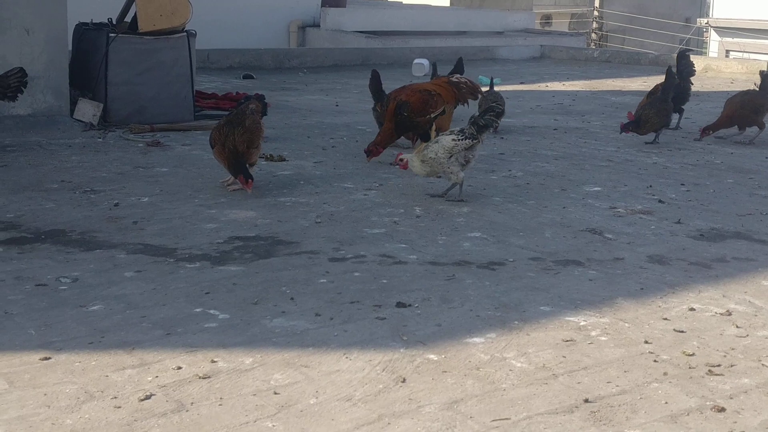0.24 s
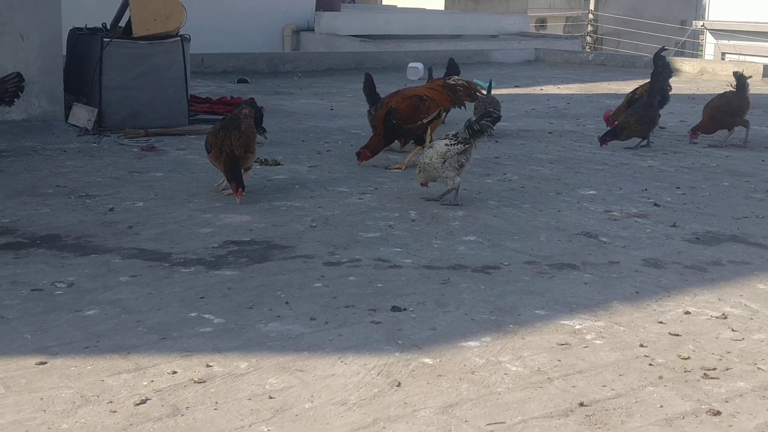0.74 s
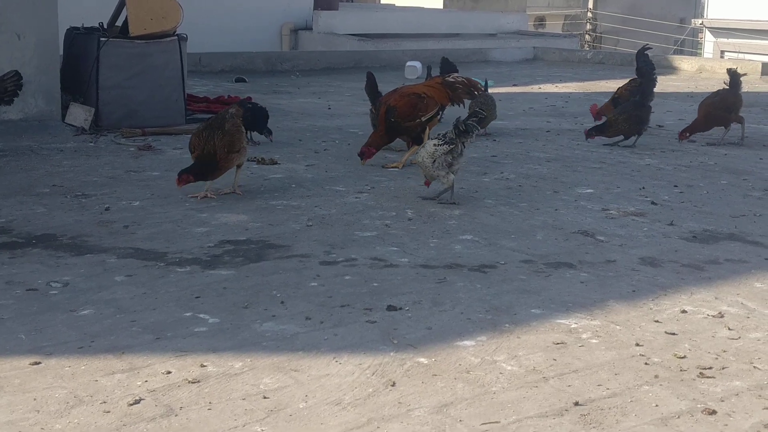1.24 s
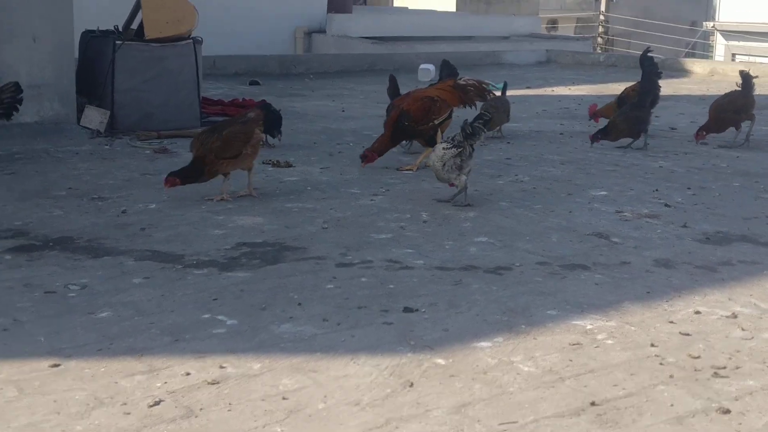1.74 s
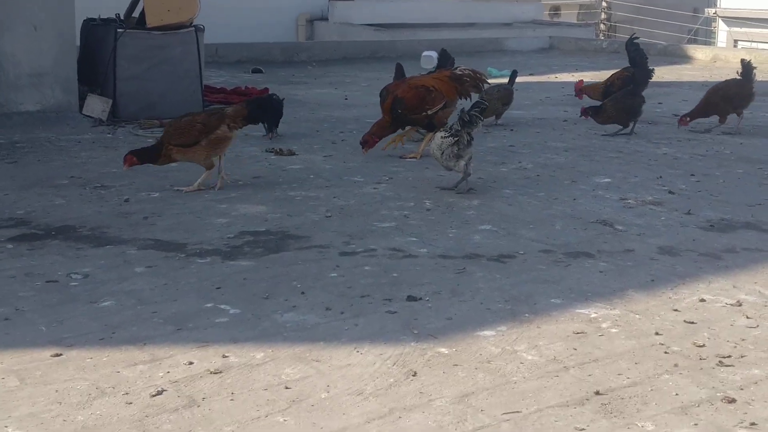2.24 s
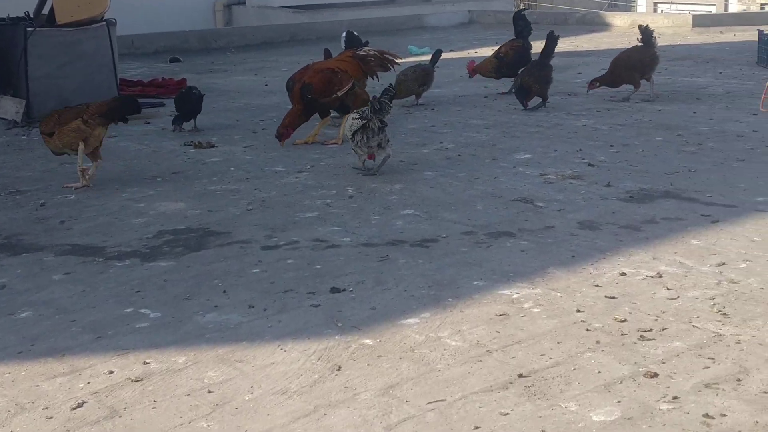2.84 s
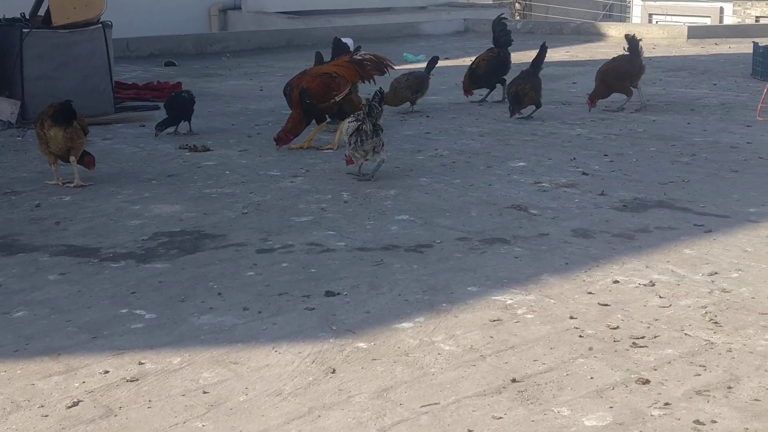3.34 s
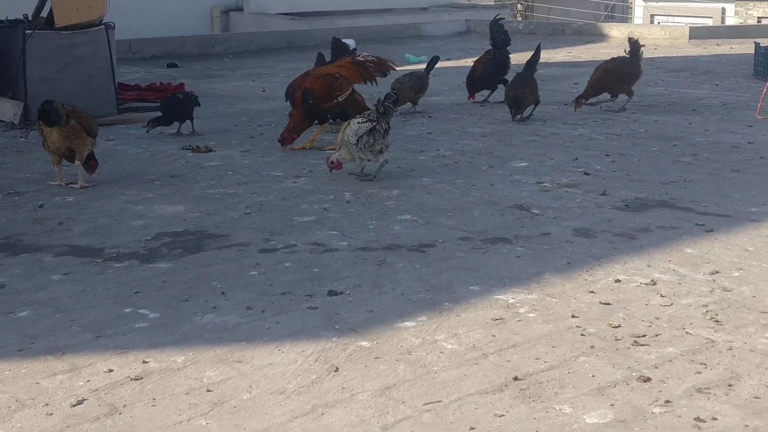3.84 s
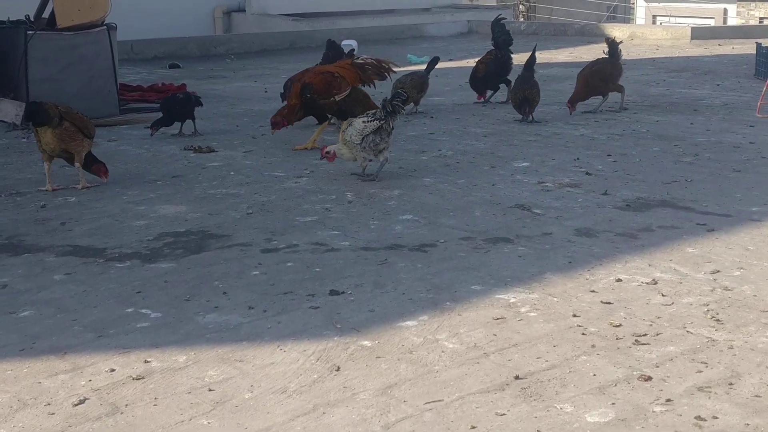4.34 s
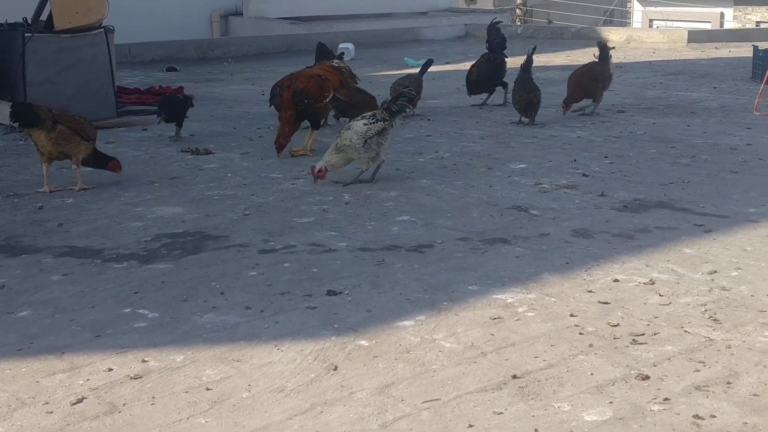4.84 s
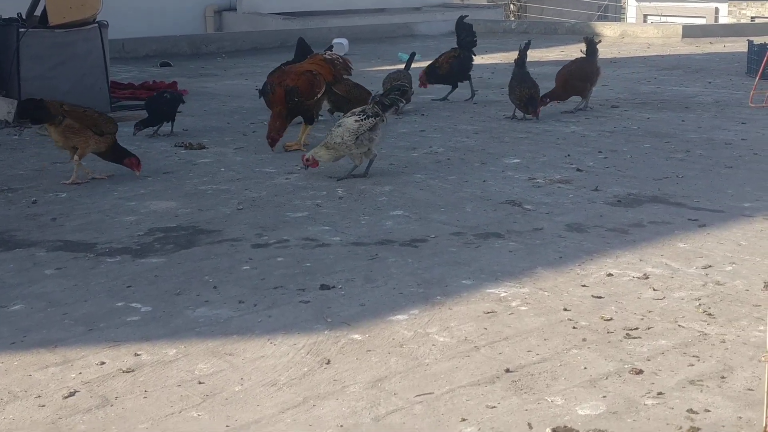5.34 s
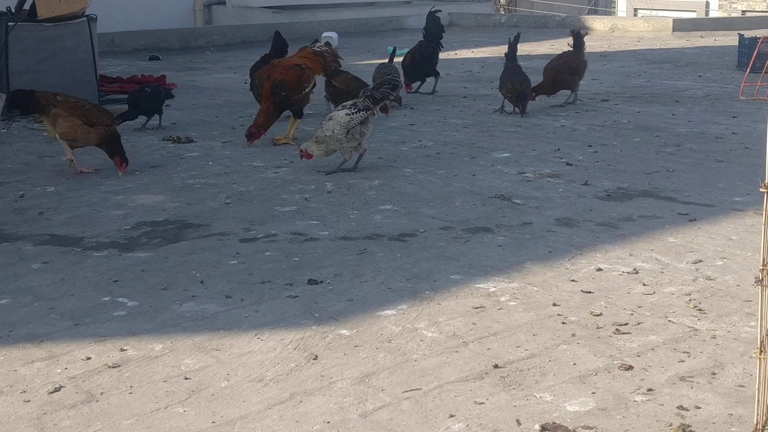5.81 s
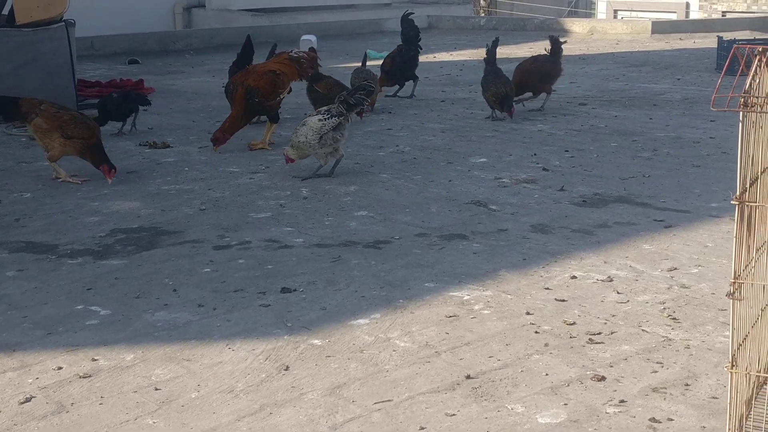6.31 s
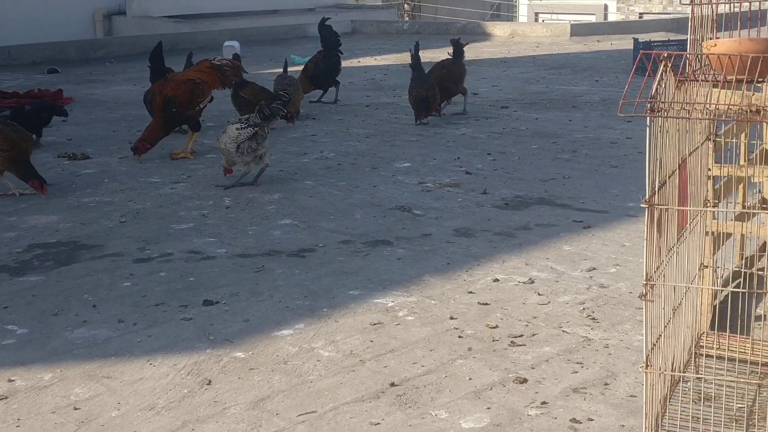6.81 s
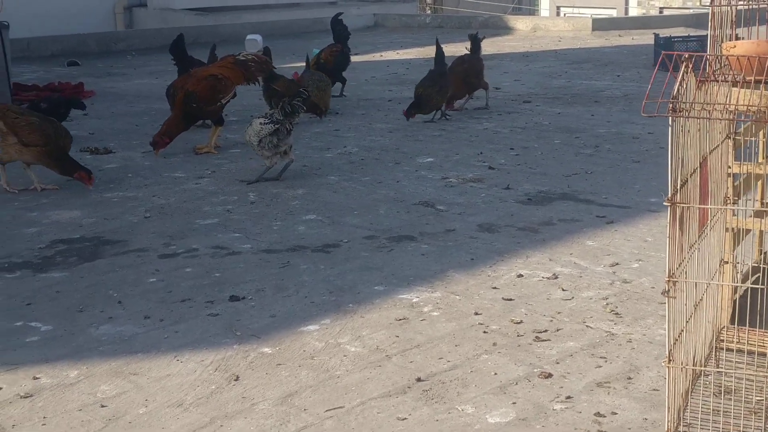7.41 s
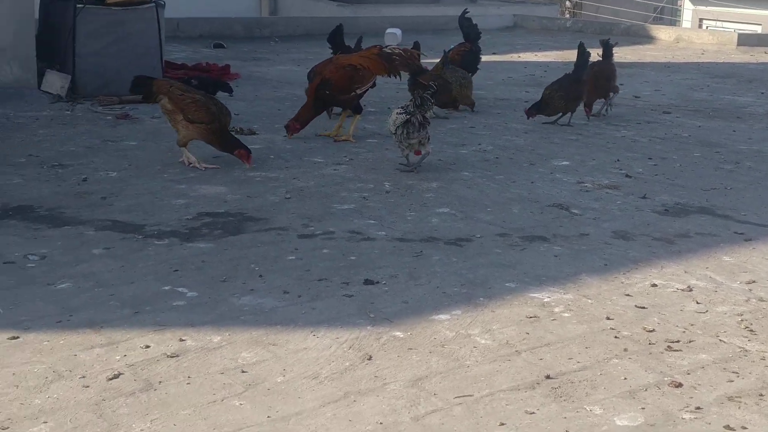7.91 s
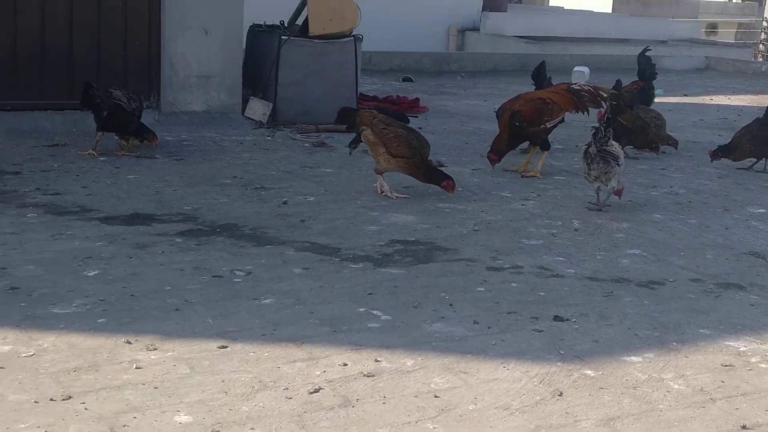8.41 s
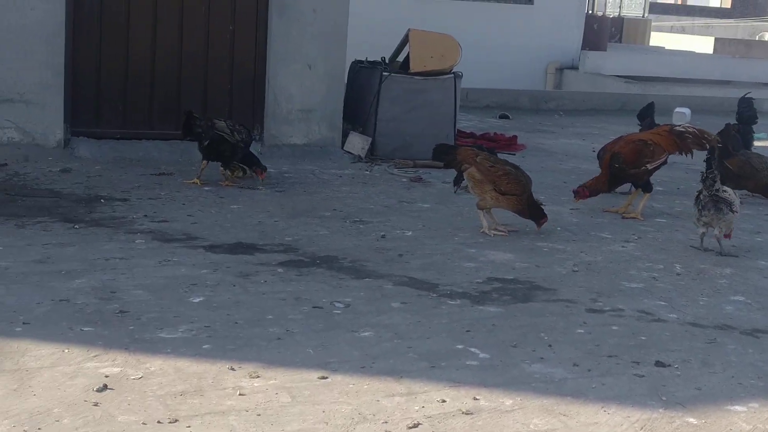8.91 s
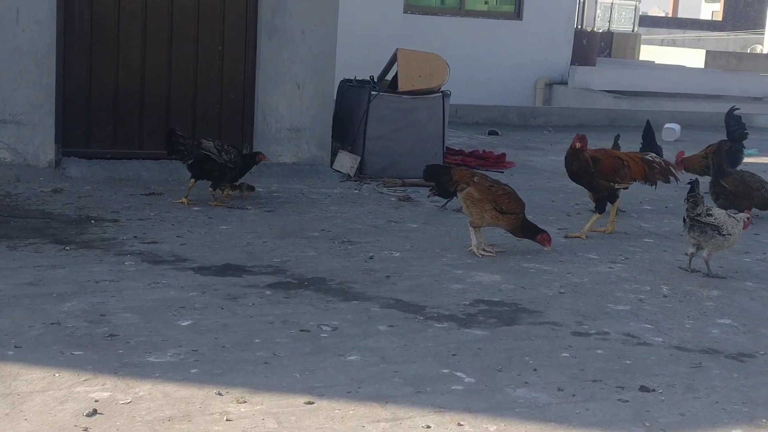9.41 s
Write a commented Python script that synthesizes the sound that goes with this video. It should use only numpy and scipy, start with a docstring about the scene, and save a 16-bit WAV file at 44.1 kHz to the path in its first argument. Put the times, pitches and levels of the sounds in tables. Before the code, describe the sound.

A rooster gives a long, rapid run of short throaty clucks on an echoing concrete yard, with soft hen murmurs and small birds chirping.

```python
"""A long run of short, throaty clucks, eight or so a second: a rooster calls the hens to food on a concrete yard.
Each cluck is a buzz of harmonics with breathy rasp, shaped by the throat, windpipe and beak.
The flock murmurs in hoarse tones, small birds chirp in quick glides, and feet scuff and tick as grainy hiss.
Walls echo, a town rumbles far off as wavering noise, and one dull bump hits the phone.
The phone has two unlike microphone ports; the left one is nearer, thinner and brighter."""
import sys
import numpy as np
from scipy import signal
from scipy.fft import rfft, irfft, next_fast_len
from scipy.io import wavfile
from scipy.ndimage import uniform_filter1d

SR = 44100
rng = np.random.default_rng(int(sys.argv[2]) if len(sys.argv) > 2 else 0)


def waveform_to_disk(signal):
    """Save audio, clipped to [-1, 1], as 16-bit WAV at the path in sys.argv[1]."""
    frames = np.transpose(np.atleast_2d(signal))
    scaled = np.clip(frames, -1, 1) * 32767
    samples = np.round(scaled).astype(np.int16)
    wavfile.write(sys.argv[1], SR, samples)


N = 426006

# Far town noise, relative colour: pitch_hz, level_db (per Hz)
TOWN_COLOUR = [(40, 12), (60, 2.5), (90, 3.5), (200, -4), (330, -12.5), (410, -22.5), (630, -6), (900, -11),
               (1380, -12), (2730, -20.5), (5250, -33.5), (6150, -42.5), (8400, -48), (12500, -39.5),
               (15800, -37.5)]
# Traffic bass near 60 Hz: start_s, level_db
TRAFFIC_BASS = [(0, -45.5), (.4, -49), (1.05, -43.5), (1.9, -50.5), (2.3, -48), (3.7, -53.5), (4.7, -51.5),
                (6.5, -49.5), (9.66, -63)]
# Echoes from the nearer walls: left_delay_s, right_delay_s, level_db
WALL_ECHOES = [(.034, .028, -21), (.068, .062, -28)]
# Bird chirps: start_s, length_ms, level_db (at 3500 Hz), first_pitch_hz, last_pitch_hz
CHIRPS = [(0.066, 33, -50.5, 2770, 4840), (0.463, 26, -49, 3000, 5260), (0.623, 22, -46.5, 2970, 4940),
          (0.806, 26, -49, 2540, 4470), (0.891, 37, -53, 3630, 5600), (1.017, 20, -51, 3290, 4210),
          (1.237, 21, -47, 2600, 4280), (1.311, 27, -51, 2940, 5150), (1.441, 43, -46, 3610, 2770),
          (1.471, 32, -45, 2790, 4370), (2.952, 16, -38, 4250, 3170), (2.966, 27, -43, 4450, 4270),
          (3.088, 16, -35, 5580, 3300), (3.104, 31, -43.5, 4530, 4200), (3.097, 31, -39, 3240, 3200),
          (3.901, 41, -55, 3900, 2910), (4.577, 39, -55, 2740, 4500), (4.155, 25, -56, 2740, 2930),
          (4.38, 22, -53, 3550, 3520), (4.55, 40, -56, 5700, 5140), (4.74, 26, -48, 3280, 4050),
          (4.667, 21, -46, 2560, 4270), (4.831, 35, -46.5, 2930, 4850), (4.91, 14, -50, 2660, 4350),
          (5.149, 37, -50, 2720, 5030), (5.277, 25, -46.5, 2460, 4100), (5.13, 13, -53, 4600, 3980),
          (5.305, 57, -51, 3900, 3750), (5.378, 36, -60, 5700, 5000), (5.419, 21, -50, 2380, 4180),
          (5.635, 35, -49, 2450, 5200), (5.87, 250, -63, 9550, 10800), (6.08, 97, -62, 10750, 9800),
          (6.122, 27, -55, 2600, 5270), (6.335, 25, -50, 4100, 3750), (6.352, 23, -51, 3800, 5030),
          (6.61, 18, -45, 2740, 3970), (6.662, 23, -56, 4060, 5140), (7.121, 32, -53, 2690, 5140),
          (7.28, 33, -48, 3700, 3080), (8.555, 26, -53, 3240, 4960), (8.7, 61, -61, 4800, 4230),
          (8.797, 23, -47, 2690, 4200), (8.92, 94, -57, 10500, 11100), (9.099, 20, -57, 4100, 5240),
          (9.11, 90, -65, 10800, 9650)]
# Foot scuffs: middle_s, length_ms, level_db, extra_level_db below SCUFF_SPLIT_HZ
SCUFFS = [(.95, 400, -52, 0), (1.268, 104, -63, 11), (1.42, 215, -56.5, 4.5), (1.685, 26, -60, -10),
          (1.775, 152, -39, -13), (1.89, 20, -50, -5), (2.314, 61, -53, 6.5), (2.45, 300, -49.5, -12),
          (2.594, 106, -47, 2.5), (2.74, 140, -50.5, -5), (2.849, 115, -36, -8.5), (3.094, 103, -39.5, -7),
          (3.252, 138, -41.5, -7.5), (5.822, 100, -52, 2), (9.3, 335, -56, 6), (9.509, 63, -57, 3),
          (9.62, 240, -54.5, -1)]
# Scuff hiss, relative colour: pitch_hz, level_db (per Hz)
SCUFF_COLOUR = [(1180, 4), (2000, 8), (2320, 3), (2830, 6), (5550, -7), (6540, -10.5), (7190, -21),
                (10300, -7.5), (15800, -13.5)]
# Ticks of grit: start_s, level_db (before the grit's random size)
TICKS = [(0.3501, -63), (0.5856, -64), (1.9826, -53), (3.2, -49), (3.5014, -59.5), (5.1238, -56),
         (5.816, -53)]
# Bumps on the phone: start_s, level_db (before rise and decay), pitch_hz, fade_s (to fall 60 dB)
KNOCKS = [(7.187, -4, 182, 0.012)]
# Rooster clucks: start_s, length_ms, level_db, pitch_hz (near mid-cluck), loudest_point (share of length);
# then added to VOICE: pitch_sag (share of pitch), second_harmonic_db, middle_db, beak_db
CLUCKS = [(0.017, 35, -35.5, 273, 0.37, -0.09, 6.5, 2.5, 11),
          (0.151, 20.5, -31, 319.4, 0.41, -0.009, -3, -2.5, -3),
          (0.28, 32.7, -34.5, 323.7, 0.66, -0.08, 3, -0.5, -7),
          (0.347, 24, -35.5, 347.5, 0.46, 0.05, 0, 3, -12),
          (0.414, 18.6, -27, 316, 0.28, -0.059, -4.5, -1, -2),
          (0.533, 21.6, -31, 341.4, 1, -0.026, 0, 0, -7.5),
          (0.656, 23.6, -32.5, 302.4, 0.44, -0.014, 4, 0.5, -9.5),
          (0.783, 12, -28.5, 315.3, 0.67, -0.079, 0.5, -12, -11),
          (0.896, 20, -26.5, 313, 0.39, 0.018, -1, -4, -8.5),
          (1.017, 17.7, -26, 312.5, 0.59, -0.036, 1.5, 0.5, -5),
          (1.13, 24, -26.5, 313.5, 0.35, 0.03, -0.5, 1, -0.5),
          (1.255, 23.5, -26.5, 313.5, 0.51, -0.011, 1, 1.5, 4),
          (1.38, 22, -25.5, 309.8, 0.26, 0.0061, 1.5, 0.5, 2),
          (1.505, 26.4, -26.5, 305.3, 0.11, -0.024, 3, 0.5, 2),
          (1.626, 24.2, -24.5, 312, 0.52, -0.034, -1.5, 0, -1),
          (1.752, 22.5, -24.5, 307.8, 0.52, -0.019, -2, 0, -4),
          (1.872, 33.7, -27.5, 306.5, 0.35, -0.051, 0, 0, 4),
          (2.004, 35, -25.5, 309.2, 0.28, -0.015, -1, -3, -1),
          (2.143, 30.3, -25, 309, 0.58, 0.0076, -0.5, -1.5, 0),
          (2.3, 34.4, -24.5, 320, 0.44, -0.1, -1, 1.5, 5),
          (2.464, 47, -25.5, 310.2, 0.36, -0.041, 1, 1.5, 2),
          (2.577, 27, -25.5, 323, 0.4, -0.0039, 1, 1, 1), (2.608, 20, -29, 317.4, 0.36, -0.031, 6, 4, 9),
          (2.732, 30, -25.5, 311.2, 0.14, 0.0053, 2.5, 3.5, 0),
          (2.824, 24.2, -26.5, 325.6, 0.59, 0.0045, 3.5, 2, 7),
          (2.964, 18.4, -23, 311.8, 0.97, -0.029, 3, 6, -1),
          (3.104, 24.0, -27.5, 307.3, 0.62, -0.0073, 5.5, 5.5, -1),
          (3.248, 33, -25.5, 319.2, 0.28, -0.036, 2, 4.5, -1.5),
          (3.4, 43, -27, 306.4, 0.23, 0.029, 3, 3.5, 2.5),
          (3.567, 40, -25, 310, 0.42, 0.014, 2.5, 1.5, 1.5),
          (3.721, 31.5, -30.5, 307, 0.48, -0.0062, 4, 2, 4),
          (3.772, 35, -36, 330, 0.2, -0.035, -2, -10, -13),
          (3.815, 23.5, -27, 318.3, 0.15, -0.023, -4.5, 2, 3.5),
          (3.85, 18.6, -30, 312.7, 0.34, -0.011, -0.5, 2, 1.5),
          (3.964, 34.5, -32, 301.5, 0.14, -0.054, 1, 2, 4),
          (3.998, 26, -34.5, 311.4, 0.33, 0.05, 3, -10, -12),
          (4.12, 33.6, -29, 304.3, 0.18, -0.044, 0, 3.5, 4),
          (4.264, 42, -29, 313.5, 0.28, -0.061, 3, 4, -2), (4.419, 36, -30.5, 320, 0.39, -0.024, 3.5, 4, 3),
          (4.56, 39, -28, 328, 0.22, -0.036, -2, 1.5, 1),
          (4.68, 22, -26.5, 322.6, 0.31, -0.028, -2.5, 2, 0),
          (4.793, 40.6, -32, 321, 0.36, 0.029, 0.5, 2, -1), (4.919, 36, -31, 311.2, 0.3, -0.13, 4, 2, 3),
          (5.049, 36, -28.5, 318.3, 0.3, -0.02, 0.5, 2, -1),
          (5.136, 20.8, -27.5, 321, 0.41, 0.041, -2, 1.5, -0.5),
          (5.235, 25.7, -31, 326.7, 0.41, 0.024, 1, -0.5, 4),
          (5.352, 27, -29, 317.7, 0.19, -0.14, 4.5, 4, 2),
          (5.471, 35.6, -29, 323.6, 0.28, -0.063, 4, 2.5, -4),
          (5.592, 29.6, -31, 339, 0.61, 0.014, 0.5, 2, -1),
          (5.709, 33, -27.5, 327.6, 0.05, -0.091, 0.5, 0, 5.5),
          (5.824, 35.7, -26.5, 315.3, 0.16, -0.052, 3.5, 3.5, 3),
          (5.955, 29.2, -24, 354.2, 0.33, 0.002, -3, 1.5, 0.5),
          (6.083, 38.5, -25, 359.7, 0.29, 0.022, -1, -1, 3.5),
          (6.223, 28.6, -25, 370.6, 0.36, 0.033, -3, -1, 2.5),
          (6.366, 34.3, -30, 374.4, 0.69, 0.072, -6, -6, -5),
          (6.466, 63, -29, 333, 0.02, 0.002, -1, 4, -0.5),
          (6.581, 29.2, -27, 357.4, 0.4, 0.017, -5.5, 4, 1),
          (6.698, 34, -30.5, 383, 0.37, -0.04, -8.5, 1, 3),
          (6.816, 36, -30, 366.3, 0.43, 0.062, 0.5, 0.0, -7),
          (6.939, 40.7, -30, 359, 0.7, 0.065, 1, 0, -2.5),
          (7.073, 42.5, -30, 386.8, 0.7, 0.041, 2, -7, -0.5),
          (7.165, 76, -29, 341.3, 0.57, -0.081, 4, -6.5, 3.5),
          (7.313, 32, -28, 342.3, 0.46, -0.1, 2.5, -2.5, 4.5),
          (7.444, 37.2, -26.5, 371.4, 0.92, -0.0064, 0.5, -3, 6.5),
          (7.587, 44.4, -27.5, 340.7, 0.13, -0.0099, 2, -1, 0),
          (7.723, 31.4, -28.5, 362.4, 0.43, 0.025, -3, -2, 2.5),
          (7.848, 59, -30.5, 383, 0.49, 0.039, 2, -3, 5), (7.919, 72, -31, 353, 0.54, 0.037, -1, 3.5, -5),
          (7.984, 47, -31.5, 347.4, 0.32, 0.011, -2.5, 2.5, -1),
          (8.1, 39, -29, 366.5, 0.39, 0.051, -5.5, 1, -2.5),
          (8.234, 40.6, -27.5, 402, 0.73, 0.042, -2.5, 0, 0),
          (8.37, 37, -26.5, 369.7, 0.43, -0.055, -0.5, -3, -1.5),
          (8.491, 35, -27.5, 373, 0.6, -0.017, -2.5, 0, -0.5),
          (8.634, 41, -27.5, 383.3, 0.46, -0.043, -1, -5, -0.5),
          (8.73, 33.6, -27, 351, 0.51, 0.07, -3.5, -1.5, -3.5),
          (8.873, 45, -27.5, 395.6, 0.54, -0.047, -2, -0.5, 0.5),
          (9.056, 57, -28.5, 367.2, 0.29, -0.05, -1, -1, 0),
          (9.14, 72.6, -32.5, 373.8, 0.25, -0.039, -2, -1, -1),
          (9.285, 60, -44.5, 300, 0.42, 0.081, 0, 0, 2.0), (9.374, 21, -27, 282.6, 0.072, 0.16, 17, 4, 10),
          (9.466, 49, -35.5, 344.5, 0.64, 0.0073, -2, -4, -3),
          (9.525, 17, -35, 300.7, 0.49, -0.033, 5, 10, 13)]
# How the voice changes along the run: start_s, pitch_sag (share of pitch),
# second_harmonic_db (against the 3rd, at REST_HZ), fourth_harmonic_db (against the 3rd),
# middle_db (middle resonance), beak_hz (beak resonance), beak_db, lead_in_db
VOICE = [(0, 0.15, -7, -10, -12, 2610, -25.5, -10), (.75, 0.1, -11, -16.5, -13.5, 2780, -2, -15.5),
         (1.3, 0.075, -13.5, -8, -13.5, 2670, -21.5, -18.5),
         (2.1, 0.05, -13.5, -8.5, -11, 2580, -23.5, -20.5),
         (2.9, 0.016, -18.5, -14.5, -20, 2400, -24.5, -23),
         (3.6, -0.022, -13.5, -10, -11.5, 2610, -17.5, -22.5),
         (4, 0.11, -12.5, -15, -19.5, 2520, -24.5, -18), (4.5, 0.032, -15, -12, -14.5, 2880, -16.5, -22),
         (5.2, 0.14, -19, -9.5, -16.5, 3055, -18.5, -29), (5.8, 0.14, -12, -13, -16, 2740, -21, -45),
         (6.2, 0.12, -5.5, -35, -20, 2790, -13.5, -28), (6.55, 0.21, -7, -15, -26, 2940, -14, -22.5),
         (7.2, 0.23, -10, -9.5, -10.5, 2816, -15, -29.5), (8, 0.181, -10, -6, -17, 2940, -17.5, -23),
         (8.6, 0.19, -12, -5.5, -15, 2830, -8.5, -22), (9.151, 0.15, -8, -5.5, -13.5, 2685, -11, -17.5),
         (9.3, -0.054, 19, 15, -1, 2350, -5, -22), (9.38, -0.35, 28, 5, -20, 2280, -27, -44),
         (9.471, 0.14, 6, -15, -24, 2390, -22, -34), (9.53, 0.11, 12, 12, -10, 2500, -13, -17)]
# Roughness of the voice: start_s, roughness (0-1)
ROUGHNESS = [(0, .3), (.8, .12), (1.3, .07), (2.2, .08), (2.5, .14), (3.4, .12), (3.6, .04), (4, .22),
             (5.6, .2), (6, .2), (6.5, .3), (7, .3), (8.3, .22), (9.2, .25), (9.35, .06)]
# Lower tone of the lead-in, before its fall and wobble: start_s, pitch_hz
LEAD_IN_PITCH = [(0, 487.7), (1.5, 481.6), (4, 464.4), (6, 433), (9.6, 451)]
# Fundamental against the 3rd harmonic, before the windpipe's low cut: start_s, level_db
FIRST_HARMONIC = [(0, -4), (1, -13), (4, -10), (6, -16.5), (8, -15), (9.6, -7)]
# Rise of each cluck: start_s, rise_s
ATTACK = [(0, 0.013), (5.5, 0.0051), (6, 0.048), (6.4, 0.017), (8.3, 0.023), (9.6, 0.025)]
# Middle resonance as a share of the beak's: start_s, share
MIDDLE_SHARE = [(0, 0.63), (3.5, 0.62), (5.5, 0.59), (7, 0.638), (9.2, 0.7)]
# Two weak resonances above the beak's: start_s, level_db
UPPER_RESONANCES = [(0, -44), (4, -43), (4.8, -41.5), (7.5, -43), (8.6, -37.5), (9.3, -34)]
# Left port's colour against the right: pitch_hz, level_db
LEFT_PORT = [(60, -12.5), (110, -3.5), (200, -5), (380, -0.5), (620, -2.5), (770, -7), (930, -5.5),
             (1290, -6.5), (2380, -6.5), (4400, 0.5), (8120, 4.5), (15000, 6.5)]
# Phase lead of the left port, on top of its time lead: pitch_hz, lead_radians
LEFT_PHASE = [(60, .9), (130, .6), (290, .1), (620, -.2), (760, -.8), (930, -.7), (1150, -.2), (1800, -.45),
              (2700, .1)]
# How alike diffuse sound is at the two ports: pitch_hz, likeness (0-1)
ALIKE = [(60, 0.92), (250, 1), (1000, 0.92), (2500, 0), (5000, 0), (15000, 0)]

SIZE = next_fast_len(N + SR)  # room for a one-second tail
FREQ = np.maximum(np.arange(SIZE // 2 + 1) * SR / SIZE, 1)
TOWN_DB = -42.5  # the town without its traffic bass
# Close scatter from ground and crates, and the yard's longer tail; t60 is the time to fall 60 dB
GROUND_T60_S, GROUND_DB = .11, -13
YARD_T60_S, YARD_DB = .6, -19
YARD_HZ = 3750  # the tail grows duller above this
CHIRP_STEEPEST, CHIRP_STEEPNESS = .35, 3.5  # share of the chirp where the glide is fastest; its sharpness
CHIRP_WARBLE_HZ = 55  # quick unsteadiness of the pitch
SCUFF_SPLIT_HZ, SCUFF_RIGHT_DB = 6650, (-2, -7.5)  # right against left, below and above the split
HENS_PER_S = 9
HENS_MIN_DB, HEN_BASE_HZ, HEN_BASE_MS = -45, 334.7, 45  # each murmur varies around or above these
LEAD_IN_S = .026  # how long before the cluck the lead-in starts
THROAT_HZ, THROAT_WIDTH_HZ, THROAT_RING = 904, 550, .25  # the last is the share of ring added to the voice
REST_HZ, SECOND_DB_PER_HZ = 304, 0.19  # a higher pitch brings the 2nd harmonic nearer the throat resonance
SAG_BY_MIDDLE = .45  # share of the sag counted as done near mid-cluck
DROOP_PER_S = 5  # share of the pitch lost per second once the cluck dies away
UPPER_SHARES = 1.52, 2  # the two upper resonances over the beak resonance
LEFT_LEAD_MS = .41
BOTTOM_HZ, TOP_HZ = 51.9, 15700  # the phone's limits


def undb(db):
    """Turns dB into gain."""
    return 10 ** (np.asarray(db) / 20)


def on_freq(table):
    """Reads a (Hz, value) table at every frequency bin, along a logarithmic pitch scale."""
    hz, value = np.transpose(table)
    return np.interp(np.log(FREQ), np.log(hz), value)


def over_time(table, s):
    """Reads a (s, value) table at time s, in straight lines between its points."""
    return np.interp(s, *np.transpose(table))


def filtered(x, gain):
    """Sends x through a frequency response."""
    return irfft(rfft(x, SIZE) * gain, SIZE)[..., :N]


def unit(x):
    """Scales x to an rms level of 1."""
    return x / np.sqrt(np.mean(x ** 2))


def walk(rate, count=N):
    """Random values that slide to a new target about rate times a second; spread near 1."""
    hold = max(int(SR / rate), 1)
    steps = np.repeat(rng.standard_normal(count // hold + 1), hold)
    return 1.92 * uniform_filter1d(steps, hold)[:count]


def add(out, s, x):
    """Mixes x in from time s, cutting what falls outside."""
    i = int(s * SR)
    x = x[max(-i, 0):N - i]
    out[max(i, 0):max(i, 0) + len(x)] += x


def ring(x, hz, width_hz):
    """Sends x twice through a resonance, then levels it to rms 1."""
    b, a = signal.iirpeak(hz, hz / width_hz, fs=SR)
    once = signal.lfilter(b, a, x)
    return unit(signal.lfilter(b, a, once))


def town():
    """Two unrelated versions of far town noise: octave bands that waver, and traffic bass that swells."""
    bands = 0
    colour = undb(on_freq(TOWN_COLOUR)) * rfft(rng.standard_normal((2, SIZE)))
    for hz in 40 * 2 ** np.arange(9):
        octaves_away = np.clip(np.log2(FREQ / hz), -1, 1)
        band = colour * np.cos(np.pi / 2 * octaves_away) ** 2
        waver = undb(.7 * walk(2) + 1.5 * walk(12))
        bands = bands + waver * irfft(band, SIZE)[:, :N]
    bass_shape = 1 / (1 + ((FREQ - 59) / 14) ** 4)
    bass = unit(filtered(rng.standard_normal((2, N)), bass_shape))
    bass_db = over_time(TRAFFIC_BASS, np.arange(N) / SR) + 0.99 * walk(2.87)
    return undb(TOWN_DB) * unit(bands) + undb(bass_db) * bass


def yard(x):
    """Delayed copies from the walls, and a fading noise tail that is unrelated at the two ports."""
    t = np.arange(SR) / SR
    tail = 0
    for t60, db in ((GROUND_T60_S, GROUND_DB), (YARD_T60_S, YARD_DB)):
        decay = np.exp(-np.log(1000) * t / t60) * np.minimum(t / 0.0011, 1)
        scatter = rng.standard_normal((2, SR)) * decay / np.sqrt(np.sum(decay ** 2))
        tail = tail + undb(db) * scatter
    echoes = 0
    for left, right, db in WALL_ECHOES:
        delays = np.array([[left], [right]])
        echoes = echoes + undb(db) * np.exp(-2j * np.pi * FREQ * delays)
    duller = 1 / (1 + 1j * FREQ / YARD_HZ)
    return filtered(x, echoes), filtered(x, rfft(tail, SIZE) * duller)


def knock():
    """A dull bump on the phone's body: a low tone that dies away very fast."""
    out, t = np.zeros(N), np.arange(4000) / SR
    for s, db, hz, t60 in KNOCKS:
        decay = np.exp(-np.log(1000) * t / t60) * np.minimum(t / 0.0038, 1)
        add(out, s, -undb(db) * np.sin(2 * np.pi * hz * t) * decay)
    return out


def feet():
    """Scuffs of grainy hiss, unrelated at the two ports, and lone ticks of grit."""
    t, gain = np.arange(N) / SR, np.zeros((2, N))
    for s, ms, db, low_db in SCUFFS:
        a, b = max(int((s - ms / 1000) * SR), 0), int((s + ms / 1000) * SR)
        swell = np.exp(-np.abs(2 * (t[a:b] - s) * 1000 / ms) ** 3)
        gain[:, a:b] += undb([[db + low_db], [db]]) * swell
    grains = rng.standard_normal((2, N)) * undb(1.5 * walk(300) + walk(30))
    hiss = unit(filtered(grains, undb(on_freq(SCUFF_COLOUR))))
    low = signal.lfilter(*signal.butter(4, SCUFF_SPLIT_HZ, fs=SR), hiss)
    high = signal.lfilter(*signal.butter(4, SCUFF_SPLIT_HZ, "high", fs=SR), hiss)
    out = np.zeros((2, N))
    for band, level, right_db in zip((low, high), gain, SCUFF_RIGHT_DB):
        out += band * level * undb([[0], [right_db]])
    tick_t = np.arange(300) / SR
    for s, db in TICKS:
        grit = rng.standard_normal((2, 300))
        for port, side, port_db in zip(out, grit, (0, SCUFF_RIGHT_DB[0])):
            # differencing twice makes the noise sharp and bright
            click = np.diff(side, 2) * np.exp(-tick_t[2:] / 0.006)
            add(port, s, undb(db + port_db) * click)
    return out


def birds():
    """Whistled glides that start slowly, shoot on and level off, fainter the higher they go."""
    out = np.zeros(N)
    for s, ms, db, first_hz, last_hz in CHIRPS:
        u = np.arange(int(ms * SR / 1000)) / (ms * SR / 1000)
        glide = np.tanh(CHIRP_STEEPNESS * (u - CHIRP_STEEPEST))
        pitch = first_hz + (last_hz - first_hz) * (glide - glide[0]) / (glide[-1] - glide[0])
        pitch += CHIRP_WARBLE_HZ * walk(500, count=len(u))
        whistle = np.sin(2 * np.pi * np.cumsum(pitch) / SR)
        loud = undb(db + 2.34 * walk(252, count=len(u))) * np.sin(np.pi * u) ** .5
        add(out, s, loud * 3500 / pitch * whistle)
    return out


def hens():
    """Soft hoarse murmurs at random moments: overtones without a fundamental, on an unsteady glide."""
    out, k = np.zeros(N), np.arange(2, 10)[:, None]
    for when, high, glide, long, loud in rng.random((int(HENS_PER_S * N / SR), 5)):
        u = np.linspace(0, 1, int(HEN_BASE_MS * (.5 + long) * SR / 1000))
        bend = 1 + .4 * (glide - .6) * u + .03 * walk(200, count=len(u))
        hz = HEN_BASE_HZ * (.7 + .8 * high) * bend
        voice = (np.sin(k * 2 * np.pi * np.cumsum(hz) / SR) / k ** 1.7).sum(0)
        add(out, when * N / SR, undb(HENS_MIN_DB + 10 * loud) * np.sin(np.pi * u) * voice)
    return out


def resonances(tone_hz, beak_hz, beak_db, mid_db, share, upper_db):
    """Strength of each harmonic: peaks of windpipe and beak, with a steep fall above the beak's."""
    beak = undb(beak_db) / (1 + ((tone_hz - beak_hz) / 150) ** 2)
    # the windpipe's middle resonance lies below the beak's
    floor = 0.0097 / (1 + (tone_hz / 2200) ** 6)
    middle = undb(mid_db) * (floor + 1 / (1 + ((tone_hz - share * beak_hz) / 300) ** 2))
    upper = sum(undb(upper_db) / (1 + ((tone_hz - up * beak_hz) / 200) ** 2) for up in UPPER_SHARES)
    return (beak + middle) / (1 + (tone_hz / beak_hz / 1.13) ** 20) + upper


def lead_in(t, lead_hz, lead_db):
    """A soft falling tone and its stronger octave, starting before the cluck and fading into it."""
    n = len(t)
    hz = lead_hz * (1 + 0.025 * walk(83.5, count=n) - 2.3 * (t + 0.01))
    phase = 2 * np.pi * np.cumsum(hz) / SR
    swell = np.sin(np.pi * np.clip((t / LEAD_IN_S + 1) / 1.34, 0, 1))
    tone = 0.66 * np.sin(phase) + 2.4 * np.sin(2 * phase)
    return undb(lead_db + 3.07 * walk(200, count=n)) * swell * tone


def cluck(ms, db, crest, first_hz, last_hz, second_db, fourth_db, mid_db, beak_hz, beak_db, lead_db,
          lead_hz, rough, first_db, attack_s, share, upper_db):
    """A lead-in, then membranes slap shut each cycle as the pitch slides, with rasp from turbulent air."""
    t = np.arange(int((LEAD_IN_S + ms / 1000 + 0.04) * SR)) / SR - LEAD_IN_S
    n = len(t)
    # the pitch moves slowly at first; where it sags, it drops as the air runs out
    hz = first_hz + (last_hz - first_hz) * np.clip(t * 1000 / ms, 0, 1.2) ** 1.333
    hz *= 1 - DROOP_PER_S * np.maximum(t - ms / 1000 + .006, 0)
    phase = 2 * np.pi * np.cumsum(hz * (1 + .05 * rough * walk(200, count=n))) / SR

    rise = np.clip(t / attack_s + .6, 0, 1) ** 2
    fade = np.exp(-np.maximum(t - ms / 1000 + .004, 0) / .01)
    swell = np.sin(np.pi * np.clip(.5 + .5 * (t * 1000 / ms - crest), .2, .82))
    loud = rise * fade * swell * undb((.8 + 4 * rough) * walk(120, count=n))

    k = np.arange(1, 19)[:, None]
    size = resonances(k * hz, beak_hz, beak_db, mid_db, share, upper_db)
    # the overtones set in earlier and hold longer than the low harmonics
    size *= undb(-2) / (loud + .1) ** .25
    size[:4] = undb([[first_db], [second_db], [0], [fourth_db]])
    size[1] *= undb(SECOND_DB_PER_HZ * (hz - REST_HZ))
    wander = np.array([walk(150, count=n) for _ in k])
    shimmer = 1 + .6 * (rough + .05) * wander * k / 3
    voice = unit((size * shimmer * np.sin(k * phase - k * k / 6)).sum(0))

    # as the membranes slacken every second cycle weakens and turbulent air rasps in throat and beak
    slack = rough * np.clip(.3 + t * 1000 / ms, 0, 1.3)
    voice *= 1 + .9 * slack * np.sin(phase / 2)
    puffs = (1 + np.cos(phase)) * rng.standard_normal(n)
    rasp = undb(beak_db) * ring(puffs, beak_hz, 270)
    rasp += undb(mid_db + 4.5) * ring(puffs, share * beak_hz, 260)
    rasp += undb(upper_db + 3.5) * sum(ring(puffs, up * beak_hz, 150) for up in UPPER_SHARES)
    throat = ring(puffs, THROAT_HZ, THROAT_WIDTH_HZ)
    voice = voice + (.1 + slack) * throat + (.25 + slack) * rasp

    # the short windpipe radiates little below the second harmonic
    voice = signal.lfilter(*signal.butter(2, 560, "high", fs=SR), voice)
    voice /= np.sqrt(np.average(voice ** 2, weights=loud ** 2))
    voice += THROAT_RING * signal.lfilter(*signal.iirpeak(THROAT_HZ, 4, fs=SR), voice)
    air = undb(-40) * ring(puffs, 10760, 3100) + undb(-48.5) * ring(puffs, 7080, 1000)
    return undb(db) * (loud * voice + loud ** 0.3 * air + lead_in(t, lead_hz, lead_db))


def rooster():
    """Every cluck, with the voice, roughness and lead-in pitch of its part of the run."""
    out = np.zeros(N)
    times, *controls = np.transpose(VOICE)
    for s, ms, db, hz, crest, own_sag, own_second_db, own_mid_db, own_beak_db in CLUCKS:
        voice_now = [np.interp(s, times, control) for control in controls]
        sag, second_db, fourth_db, mid_db, beak_hz, beak_db, lead_db = voice_now
        sag = sag + own_sag
        first_hz = hz * (1 + SAG_BY_MIDDLE * sag)
        sound = cluck(ms, db, crest, first_hz, first_hz - sag * hz, second_db + own_second_db, fourth_db,
                      mid_db + own_mid_db, beak_hz, beak_db + own_beak_db, lead_db,
                      lead_hz=over_time(LEAD_IN_PITCH, s), rough=over_time(ROUGHNESS, s),
                      first_db=over_time(FIRST_HARMONIC, s), attack_s=over_time(ATTACK, s),
                      share=over_time(MIDDLE_SHARE, s), upper_db=over_time(UPPER_RESONANCES, s))
        add(out, s - LEAD_IN_S, sound)
    return out


def scene():
    """Rooster and hens reach both ports alike; diffuse sound only partly; the birds sit to the left."""
    poultry, chirps = rooster() + hens(), birds()
    echoes, tail = yard(poultry + chirps)
    diffuse = tail + town()
    alike = np.clip(on_freq(ALIKE), 0, 1)
    # blend the two unrelated versions so that they share part of their sound
    diffuse[1] = filtered(diffuse[0], alike) + filtered(diffuse[1], np.sqrt(1 - alike ** 2))
    sides = undb([[0], [-10]]) * chirps + feet() + undb([[-9], [0]]) * knock()
    return poultry + echoes + diffuse[::-1] + sides


def record(dry):
    """The left port hears earlier and with its own colour; the phone cuts the bottom and the top."""
    lead = 2 * np.pi * FREQ * LEFT_LEAD_MS / 1000 + on_freq(LEFT_PHASE)
    left = filtered(dry[0], undb(on_freq(LEFT_PORT)) * np.exp(1j * lead))
    ports = np.array([left, dry[1]])
    ports = signal.sosfilt(signal.butter(8, BOTTOM_HZ, "high", fs=SR, output="sos"), ports)
    return signal.sosfilt(signal.ellip(10, .2, 70, TOP_HZ, fs=SR, output="sos"), ports)


dry = scene()
out = record(dry)
waveform_to_disk(out)
```